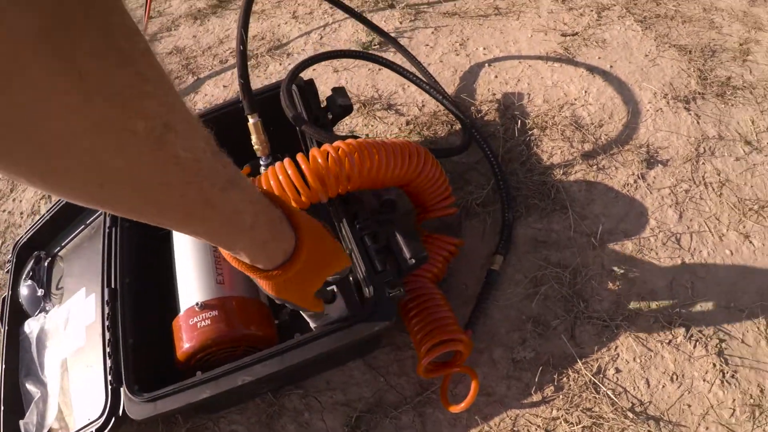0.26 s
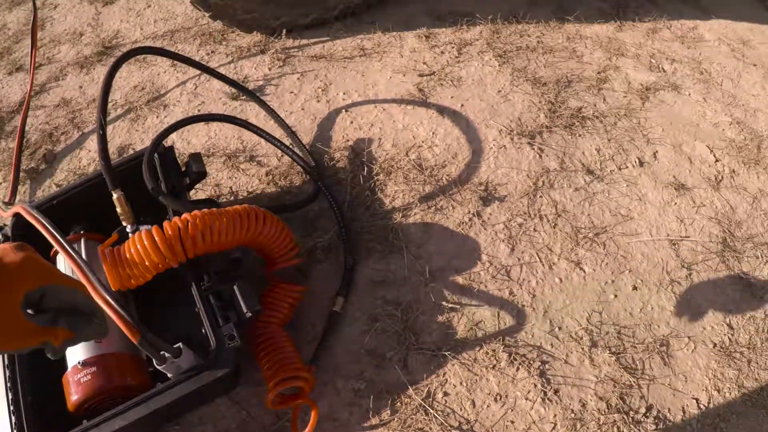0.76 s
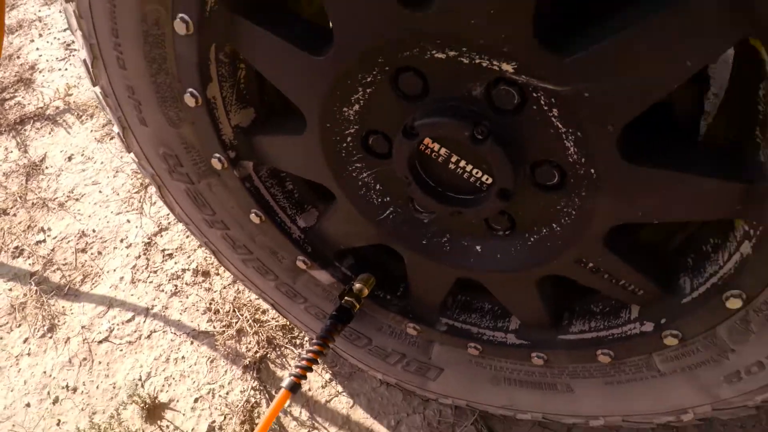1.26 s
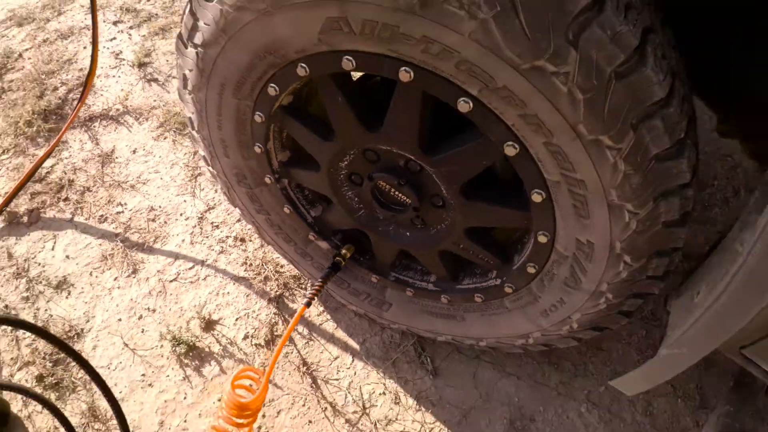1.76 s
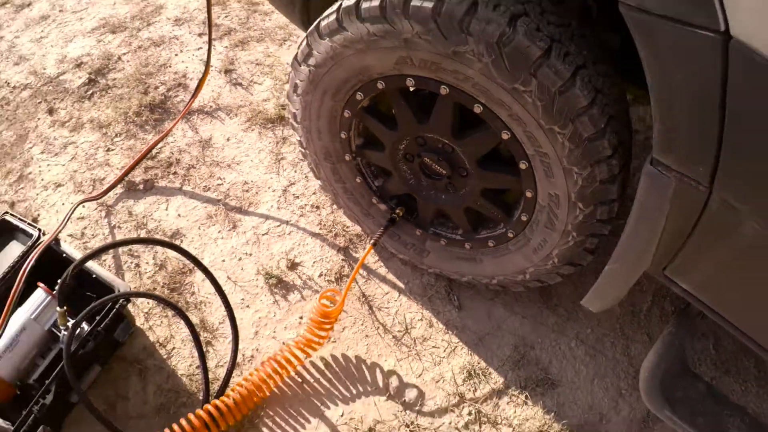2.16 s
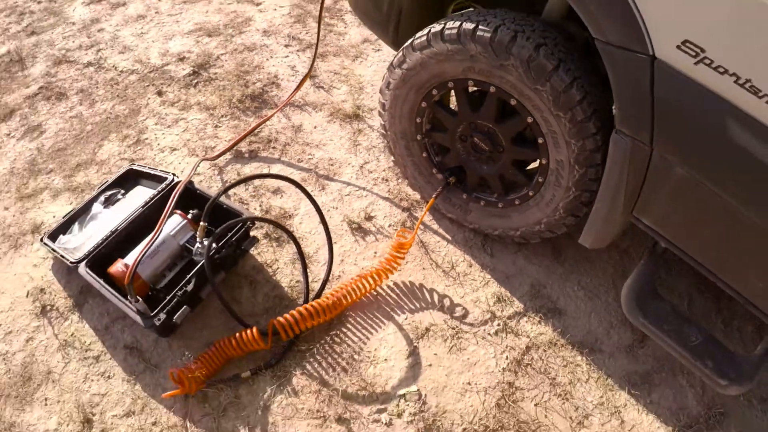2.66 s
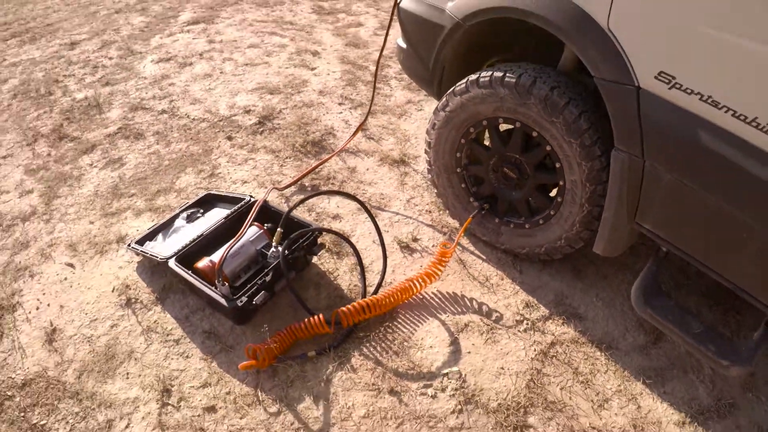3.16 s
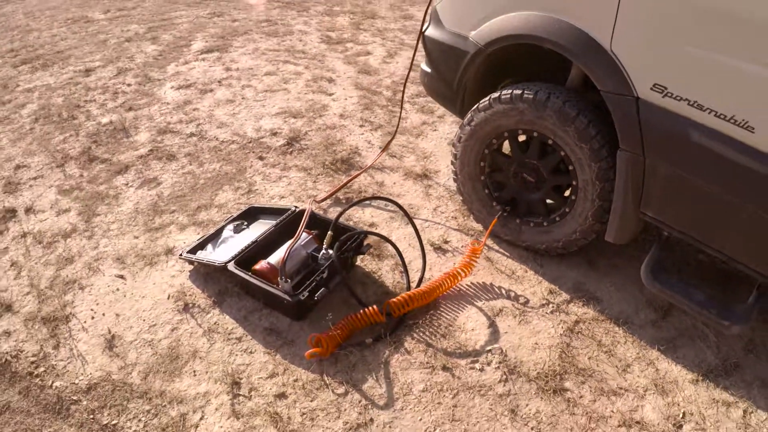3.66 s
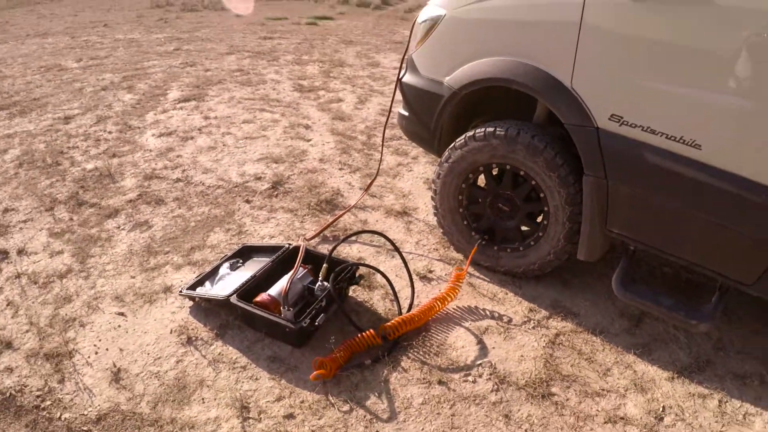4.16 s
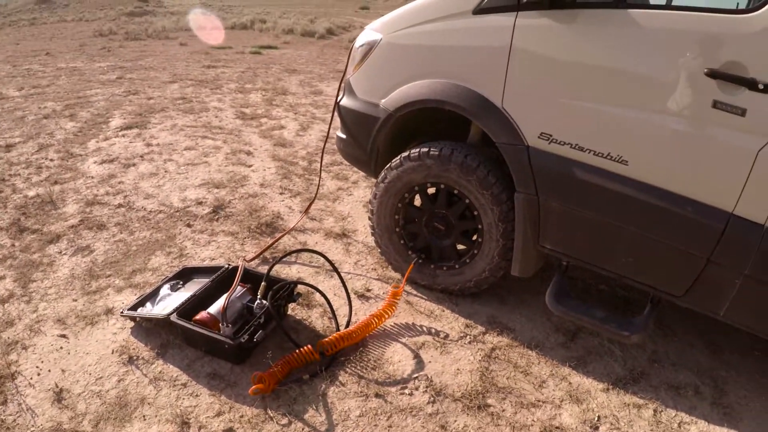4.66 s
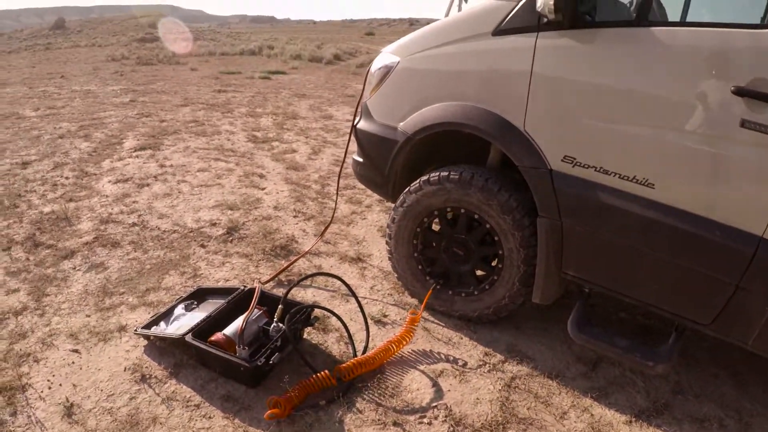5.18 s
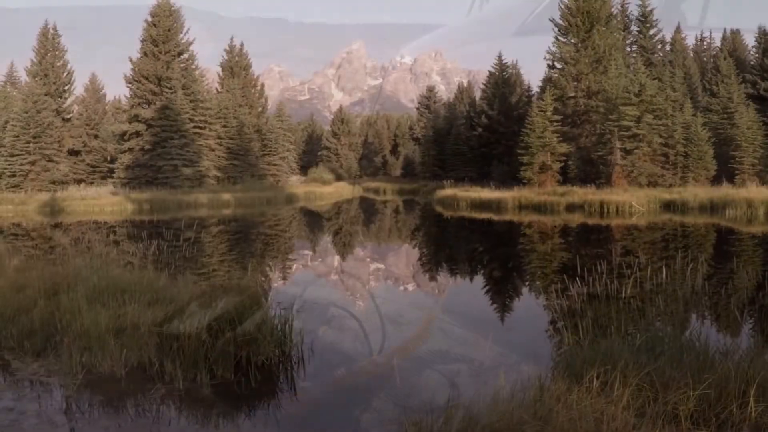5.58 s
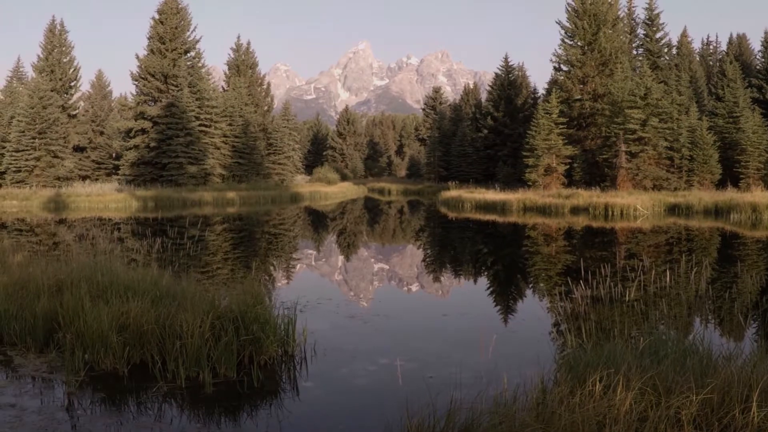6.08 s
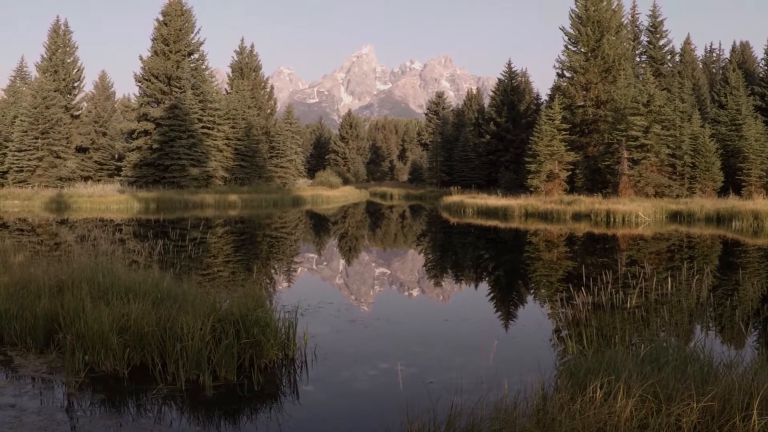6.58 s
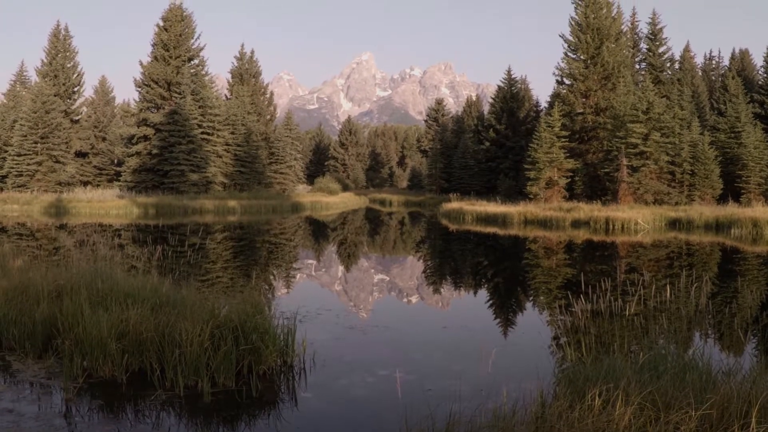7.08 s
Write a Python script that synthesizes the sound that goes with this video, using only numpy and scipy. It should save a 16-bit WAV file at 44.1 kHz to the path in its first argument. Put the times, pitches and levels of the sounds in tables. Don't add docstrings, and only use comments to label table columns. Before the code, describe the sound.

A small piston air compressor hammers loudly beside a van, fading under wind buffets, then gives way to birdsong and trickling water at a quiet pond.

```python
import sys
import numpy as np
from scipy import signal
from scipy.fft import rfft, irfft
from scipy.io import wavfile

SR = 44100
rng = np.random.default_rng(int(sys.argv[2]) if len(sys.argv) > 2 else 0)


def dump_mix(stems):
    frames = np.atleast_2d(stems).T
    limited = np.clip(frames, -1, 1)
    pcm = np.round(limited * 32767).astype(np.int16)
    wavfile.write(sys.argv[1], SR, pcm)


def voltage_ratio(decibels):
    exponent = np.asarray(decibels, float) / 20
    return 10 ** exponent


N = 323253

# order [multiple of revolution], level [dB]
STROKE_ORDERS = [(1, -11.5), (2, -11), (3, -6), (4, -8), (5, -11), (6, -7), (7, -10), (8, -19), (9, -16),
                 (10, -13), (11, -2), (12, -9), (13, 0), (14, -1), (15, -4), (16, -15), (17, -13),
                 (18, -17), (19, -23), (20, -22), (21, -25), (22, -25), (23, -23), (24, -22), (25, -27),
                 (26, -21), (27, -21), (28, -21), (29, -24), (30, -24), (31, -25), (32, -28)]
# t [s], rate [rev/s]
CRANK_SPEED = [(0.0, 68.21), (0.6, 68.28), (1.2, 68.36), (1.8, 68.41), (2.4, 68.43), (3.0, 68.57),
               (3.6, 68.49), (4.2, 68.54), (4.8, 68.63)]
# order [multiple of revolution], near level [dB], far level [dB]
GEAR_TONES = [(46, -29, -25), (48, -29, -18), (55, -28, -28), (58, -25, -17), (59, -30, -33),
              (61, -20, -20), (87, -18, -27), (88, -19, -27), (90, -21, -18), (116, -16, -16),
              (117, -15, -32), (118, -30, -14), (120, -22, -12), (122, -29, -21), (146, -22, -39),
              (148, -29, -29)]
# f [Hz], width [Hz], near level [dB], far level [dB]
METAL_RINGS = [(3260, 120, 1, -1), (3900, 550, -36, -16), (5340, 510, -8, -23), (6120, 680, 8, -2),
               (6740, 36, -18, -34), (6600, 330, -29, -2.5), (7960, 480, 7, -3), (8210, 320, 15, -1.5),
               (8840, 840, 4, 6), (9870, 280, 12, 9.5), (9870, 780, -12, -30), (11970, 720, 4.5, 3),
               (13100, 430, -8, 3), (13900, 490, -18, -16)]
# f [Hz], level [dB per Hz]
AIR_SPECTRUM = [(50, -26), (100, -7), (230, -5.5), (310, 6), (450, -1), (620, -6), (950, -2.5), (1500, -12),
                (2000, -13), (3500, -19.5), (4800, -21), (8200, -21), (14500, -21.5), (15500, -46)]
# t [s], push level [dB], flutter level [dB]
WIND_GUSTS = [(0.0, -54, -28), (0.27, -67, -39), (0.72, -33, -59), (1.36, -23, -28), (1.45, -27, -51),
              (1.62, -24, -42), (1.93, -24, -52), (2.03, -56, -46), (2.13, -24, -52), (2.3, -18.5, -33),
              (2.63, -20.5, -28), (2.8, -34, -34), (3.04, -27, -35), (3.42, -19.5, -50), (3.7, -24, -52),
              (4.23, -50, -58)]
# f [Hz], level [dB per Hz]
PUSH_SPECTRUM = [(2, -2), (8, 17), (20, 0.5), (30, -14.5), (60, -18), (300, -110)]
# f [Hz], level [dB per Hz]
FLUTTER_SPECTRUM = [(15, -17), (30, 13), (60, -5), (120, -24), (300, -57), (1500, -100)]
# f [Hz], level [dB per Hz]
HISS_SPECTRUM = [(21, -46), (35, -10), (60, -9), (123, -14), (368, -17.5), (598, -16), (947, -20.5),
                 (1350, -22), (2380, -24.5), (3770, -25), (7140, -37.5), (14600, -46.5), (15800, -49)]
# f [Hz], correlation [-1..1]
HISS_LIKENESS = [(60, 0.46), (130, 0.29), (300, 0.14), (700, .45), (1400, 0.68), (3000, 0.033),
                 (7000, 0.15), (15000, 0.57)]
# t [s], length [s], middle f [Hz], glide [octaves], peak level [dB]
LEFT_SLUR_NOTES = [(4.517, .058, 3700, -.35, -61), (4.59, .04, 4000, .6, -65),
                   (4.682, 0.054, 3800, .3, -66), (4.81, .029, 4000, .2, -62),
                   (5.12, 0.063, 2090, -.05, -58), (5.39, .045, 2400, .12, -63),
                   (5.455, .018, 4250, .13, -54), (5.69, 0.09, 2360, 0.27, -60),
                   (5.828, .094, 2150, -.25, -56), (5.948, 0.03, 4040, 0.14, -53),
                   (5.982, 0.079, 3870, -.38, -60), (6.534, .14, 2160, -0.18, -65),
                   (7.036, 0.036, 5150, -0.39, -54), (7.094, 0.024, 4500, 0.033, -47),
                   (7.07, .013, 3700, -.15, -57), (7.108, .013, 4100, .25, -51),
                   (7.185, 0.058, 4430, 0.086, -47), (7.228, .035, 4900, 0.26, -49)]
# t [s], middle f [Hz], peak level [dB]
LEFT_CHIPS = [(4.63, 3700, -68), (4.74, 3700, -65), (4.845, 3660, -61), (4.955, 3800, -63),
              (5.06, 3430, -54), (5.515, 3580, -53), (5.548, 3450, -60), (5.855, 3450, -54),
              (5.883, 3670, -58), (6.025, 3530, -49), (6.05, 3680, -52), (6.455, 3300, -54),
              (6.68, 3150, -58), (6.7, 3900, -59), (6.003, 3980, -60)]
# t [s], length [s], top f [Hz], peak level [dB]
LEFT_ARCHES = [
    (5.474, 0.036, 3670, -48.5),
    (5.733, 0.037, 2820, -56),
    (5.773, 0.045, 3480, -50),
    (5.816, 0.037, 3570, -50),
]
# t [s], peak level [dB]
TRILL_STARTS = [
    (6.14, -52),
    (6.236, -52),
    (6.318, -52),
    (6.412, -52),
    (6.507, -51),
    (6.598, -49),
]
# offset [s], length [s], first f [Hz], middle f [Hz], last f [Hz], level [dB]
TRILL_SYLLABLE = [
    (0., .02, 3150, 3050, 2850, -4),
    (.027, .03, 3000, 3600, 4000, -1),
]
# t [s], middle f [Hz], peak level [dB]
LEFT_DIVES = [
    (6.772, 5250, -54),
    (6.897, 5100, -63),
    (7.018, 5100, -64),
    (7.14, 5250, -60),
]
# t [s], length [s], middle f [Hz], peak level [dB]
LEFT_SWOOPS = [
    (7.256, .08, 5550, -47.5),
]
# t [s], first f [Hz], rise [octaves/s], t60 [s], peak level [dB]
LARGE_BUBBLES = [(4.82, 606, 4.5, 0.13, -50), (5.22, 2260, 11, 0.036, -41.5), (5.227, 89.5, -3, 0.066, -39),
                 (5.3, 594, 4, 0.16, -45.5), (5.42, 626, -4, .06, -49), (5.6, 465, 1, 0.23, -50.5),
                 (5.836, 461, 5, 0.24, -45), (6.095, 682, 15, 0.28, -48), (6.24, 730, 17, 0.048, -47),
                 (6.265, 845, 10.5, 0.15, -48), (6.275, 1960, 15, 0.036, -41),
                 (6.304, 1170, 1, 0.037, -42.5), (6.315, 597, -14, .06, -45.5),
                 (6.487, 643, -2.5, 0.19, -45.5), (6.243, 1500, 11, .05, -50), (6.8, 1850, 20, .03, -43),
                 (5.645, 1200, 15, .05, -50), (6.305, 2050, -10, .03, -48), (6.51, 620, -4, .1, -49),
                 (6.797, 1240, 10, 0.042, -45), (6.902, 1410, 34, 0.055, -45.5), (7.25, 597, 1, 0.11, -46),
                 (6.93, 654, 8.5, 0.16, -52), (7.04, 554, 0, .05, -46), (7.09, 786, 2, .05, -48),
                 (6.74, 700, 8, .05, -49), (7.3, 704, -6, .06, -53)]
# t [s], peak level [dB]
FALLING_STARTS = [
    (4.655, -59),
    (4.757, -53),
    (4.862, -53),
    (4.965, -48.5),
    (5.078, -48.5),
]
# offset [s], length [s], first f [Hz], middle f [Hz], last f [Hz], level [dB]
CHIRP_VOICES = [
    (0., 0.032, 7450, 7150, 6400, -10),
    (0.024, 0.044, 6750, 5600, 5250, -4),
    (0.036, .04, 6500, 5800, 5450, -15),
]
# t [s], length [s], middle f [Hz], glide [octaves], peak level [dB]
CENTRE_SLUR_NOTES = [
    (5.195, 0.042, 4700, 0.269, -54),
    (5.261, 0.026, 4350, -0.22, -53),
    (6.44, 0.21, 5850, .12, -69),
    (6.235, .048, 5250, .2, -64),
    (4.87, 0.056, 4200, 0.12, -62),
    (5.756, 0.021, 3950, 0.099, -53),
    (5.84, 0.039, 2900, .3, -55),
]
# t [s], length [s], top f [Hz], peak level [dB]
CENTRE_ARCH = (5.229, .038, 5500, -58)
# t [s], length [s], f [Hz], peak level [dB]
CENTRE_WHISTLES = [(5.36, .022, 2960, -58), (5.65, 0.032, 2950, -58), (5.875, 0.056, 2950, -49),
                   (6.05, 0.056, 3110, -51), (6.703, 0.027, 4250, -58), (6.727, .125, 5930, -64),
                   (6.775, .045, 4270, -61), (6.865, .075, 5900, -70), (6.86, .04, 4270, -63),
                   (6.828, 0.031, 2620, -60), (6.21, 0.038, 3100, -63), (6.578, .03, 3100, -62),
                   (6.88, .058, 3110, -61), (6.979, 0.168, 5920, -64), (7.13, 0.2, 4050, -63),
                   (7.185, 0.064, 3100, -61), (7.23, 0.092, 5870, -63)]
# t [s], held [s], f [Hz], peak level [dB], scoop level [dB]
RIGHT_WHISTLES = [
    (4.719, 0.19, 1684, -60.5, -74),
    (5.435, 0.22, 1590, -59.5, -50.5),
    (6.35, 0.245, 1646, -54, -52),
    (7.285, .2, 1646, -52, -55),
]
# t [s], peak level [dB]
DROPLETS = [
    (5.377, -53),
    (6.2, -65),
    (6.41, -66),
    (6.885, -60),
    (7.115, -64),
]

PUMP_DB, BRIGHT_DB, AIR_DB = -33.5, -7, -2.5
SETTLE_DB, SETTLE_S = -2, 0.089
FADE_FROM_S, FADE_TO_S, FADE_POWER = 0.46, 5.11, 1.074
FLARE_S, CUT_S, FLARE_DB, FLARE_RISE_DB = 5.115, 5.196, -57.5, -2
FLARE_BRIGHT_DB, FLARE_AIR_DB = -12, 0.5
THUD_LAG_TURNS, PANEL_LAG_TURNS, SCATTER = -0.1717, 0.42, 0.5
BARS, BRUSH_SLACK, SURGE = 30, 0.322, 0.0052
BRUSHES = [(0.06, -3.5), (1, -16)]
AIR_DULL_HZ, AIR_DULL_SHARE = 8000, 0.45
CALM_PUSH_DB, CALM_FLUTTER_DB, PUSH_S, FLUTTER_S = -32.5, -82, 0.062, 0.024
BUMP_S, BUMP_DB = 5.2, -53
POND_S, POND_DB, POND_START_DB, POND_FULL_S = 4.49, -51.5, -6, 5.3
RUMBLE_S, RUMBLE_DB, RUMBLE_EARLY_DB = 5.25, -41.5, -61
RUMBLE_GUST_S, RUMBLE_GUST_WIDTH_S, RUMBLE_GUST_DB = 5.99, 0.35, 5.5
CHIP_S, CHIP_GLIDE, CHIP_ARCH = 0.0276, -0.33, 0.02
DIVE_S, DIVE_GLIDE = 0.016, -0.36
SWOOP_GLIDE, SWOOP_ARCH = -0.53, 0.33
ARCH_GLIDE, ARCH, SLUR_ARCH, WHISTLE_ARCH = -0.13, 0.276, 0.017, 0.013
SCOOP_S, SCOOP_GLIDE, HELD_ARCH = 0.0363, 0.454, 0.0314
HOOK_S, HOOK_DROP, HOOK_ARCH = 0.018, 0.185, -0.11


def in_time(points, left=None):
    s, value = np.transpose(points)
    return np.interp(np.arange(N) / SR, s, value, left=left)


def at_hz(points, hz):
    point_hz, value = np.transpose(points)
    return np.interp(np.log(hz), np.log(point_hz), value)


def rms_one(x):
    return x / np.sqrt(np.mean(x ** 2) + 1e-20)


def drift(rate_hz):
    r = np.exp(-80 * np.pi * rate_hz / SR)
    slow = signal.lfilter([1], [1, -2 * r, r * r], rng.standard_normal(N // 40 + 4002))[4000:]
    return np.interp(np.arange(N) / 40, np.arange(len(slow)), rms_one(slow - slow.mean()))


def coloured(spectrum, channels=1):
    hz = np.maximum(np.fft.rfftfreq(N, 1 / SR), 1)
    white = rng.standard_normal((channels, N))
    return rms_one(irfft(rfft(white) * voltage_ratio(at_hz(spectrum, hz)), N))


def lump(s, width_s):
    t = np.arange(0, N, 16) / SR
    return np.repeat(np.exp(-0.5 * ((t - s) / width_s) ** 2), 16)[:N]


def fade():
    t = np.arange(N) / SR
    return np.clip((FADE_TO_S - t) / (FADE_TO_S - FADE_FROM_S), 1e-6, 1) ** FADE_POWER


def revolve(orders, turns):
    size = 8192
    cycle = rms_one(irfft(np.r_[0, orders], size))
    return np.interp(turns % 1 * size, np.arange(size + 1), np.r_[cycle, cycle[0]])


def body(turns):
    level = np.log(voltage_ratio(np.r_[-30, np.array(STROKE_ORDERS)[:, 1], np.full(32, -34)]))
    cepstrum = irfft(level)
    cepstrum[1:64] *= 2
    cepstrum[65:] = 0
    order = np.arange(65)
    lag_turns = np.where(order <= 10, THUD_LAG_TURNS, np.where(order <= 12, PANEL_LAG_TURNS, 0))
    spread = SCATTER * np.maximum(order - 16, 0) ** 2 + 0.139 * np.maximum(9 - order, 0) ** 2
    spread = spread - 2 * np.pi * np.cumsum(lag_turns)
    after_valve = -2 * np.pi * 0.1618 * order
    phase = 0.35 * rfft(cepstrum).imag + spread + after_valve
    return revolve(np.exp(level + 1j * phase)[1:33], turns)


def gears(turns, farness):
    flicker_db = [0.45 * drift(9) for k in range(8)]
    out = 0
    for k, (order, near_db, far_db) in enumerate(GEAR_TONES):
        level_db = near_db + (far_db - near_db) * farness + flicker_db[k % 8]
        out = out + voltage_ratio(level_db) * np.cos(2 * np.pi * order * turns)
    return out


def brush_ticks(order, slack_bars):
    draws = rng.standard_normal((BARS, 2))
    even = (np.arange(BARS) + 0.5 + slack_bars * draws[:, 0]) / BARS
    slot = even + SURGE * np.sin(2 * np.pi * even)
    intake_dip_db = 12 * np.sin(1.65 * abs(even) ** 1.3)
    size = voltage_ratio(4.5 * draws[:, 1] - intake_dip_db)
    return np.exp(-2j * np.pi * order[:, None] * slot) @ size


def metal(turns, farness):
    order = np.arange(33, 226)
    ring_hz, width_hz, near_db, far_db = np.transpose(METAL_RINGS)
    shape = 1 / (1 + 2j * (order[:, None] * 68.4 - ring_hz) / width_hz)
    free = ~np.isin(order, np.array(GEAR_TONES)[:, 0])
    direct_click = voltage_ratio(-6) * np.interp(order, [0, 90, 150, 225], [0, 1, 0.85, 0.4])
    below = np.zeros(32)
    out = 0
    for share, ring_db in ((1 - farness, near_db), (farness, far_db)):
        rings = shape @ voltage_ratio(ring_db)
        click = revolve(np.r_[below, 0.5 * rings + direct_click], turns)
        out = out + share * voltage_ratio(-4 + 0.8 * drift(20)) * click
        for slack_share, direct_db in BRUSHES:
            ticks = brush_ticks(order, BRUSH_SLACK * slack_share)
            ringing = revolve(np.r_[below, free * ticks * (rings + voltage_ratio(direct_db))], turns)
            out = out + share * voltage_ratio(-2 + 1.5 * drift(0.31)) * ringing
    return out / np.sqrt(farness ** 2 + (1 - farness) ** 2)


def puffing_air(turns, farness):
    puff = voltage_ratio(0.14 * np.cos(2 * np.pi * (turns - 0.1)))
    air = (running() * voltage_ratio(AIR_DB) + flare() * voltage_ratio(FLARE_AIR_DB)) * puff * coloured(AIR_SPECTRUM)[0]
    treble = signal.sosfiltfilt(signal.butter(1, AIR_DULL_HZ, "high", fs=SR, output="sos"), air)
    return air - AIR_DULL_SHARE * farness * treble


def running():
    t = np.arange(N) / SR
    return voltage_ratio(PUMP_DB + SETTLE_DB * np.exp(-t / SETTLE_S)) * fade()


def flare():
    t = np.arange(N) / SR
    level = voltage_ratio(FLARE_DB + FLARE_RISE_DB * (t - CUT_S) / (CUT_S - FLARE_S))
    return level * np.clip((t - FLARE_S) / 0.02, 0, 1) * np.clip((CUT_S - t) / 0.0033, 0, 1)


def compressor():
    turns = np.cumsum(in_time(CRANK_SPEED)) / SR + 0.175 + 0.0008 * drift(5)
    farness = in_time([(1.1, 0.011), (3.2, 0.75)])
    tone = voltage_ratio(3.5 + 0.045 * drift(12)) * body(turns) + gears(turns, farness)
    ticks = metal(turns + 0.00035 * drift(60), farness)
    bright = running() * voltage_ratio(BRIGHT_DB - 4.5) + flare() * voltage_ratio(FLARE_BRIGHT_DB - 4)
    whole = (running() + flare()) * tone + bright * ticks + puffing_air(turns, farness)
    return signal.sosfilt(signal.ellip(10, 1, 55, 15280, fs=SR, output="sos"), whole)


def wind():
    push = voltage_ratio(CALM_PUSH_DB) + sum(voltage_ratio(db) * lump(s, PUSH_S) for s, db, _ in WIND_GUSTS)
    flutter = voltage_ratio(CALM_FLUTTER_DB) + sum(voltage_ratio(db) * lump(s, FLUTTER_S) for s, _, db in WIND_GUSTS)
    flutter = flutter * fade() + voltage_ratio(BUMP_DB) * lump(BUMP_S, 0.016)
    push_noise = voltage_ratio(5.65 * drift(5.9)) * coloured(PUSH_SPECTRUM)[0]
    flutter_noise = voltage_ratio(2 * drift(6.5)) * coloured(FLUTTER_SPECTRUM)[0]
    return push * fade() * push_noise + flutter * flutter_noise


def far_hiss():
    level_db = in_time([(POND_S, POND_DB + POND_START_DB), (POND_FULL_S, POND_DB)], left=-120)
    hz = np.maximum(np.fft.rfftfreq(N, 1 / SR), 1)
    alike = np.clip(at_hz(HISS_LIKENESS, hz), -1, 1)
    mid, side = rfft(coloured(HISS_SPECTRUM, channels=2))
    mid = irfft(mid * np.sqrt(1 + alike), N)
    side = irfft(side * np.sqrt(1 - alike), N)
    return voltage_ratio(level_db + 0.84 + 1.4 * drift(20)) * np.array([mid + side, mid - side]) / np.sqrt(2)


def pond_rumble():
    early, late = (RUMBLE_S - 0.08, RUMBLE_EARLY_DB), (RUMBLE_S, RUMBLE_DB)
    level_db = in_time([(POND_S, RUMBLE_EARLY_DB), early, late], left=-120)
    level_db = level_db + RUMBLE_GUST_DB * lump(RUMBLE_GUST_S, RUMBLE_GUST_WIDTH_S)
    spectrum = [(1.5, -13), (8, 32), (12, 22), (22, 17), (32, -10), (60, -50), (200, -90)]
    return voltage_ratio(level_db) * coloured(spectrum)[0]


def sing(notes, rough_db):
    out = np.zeros(N + SR)
    quaver = np.r_[1 + 0.006 * drift(70), np.ones(SR)]
    for s, length_s, first_hz, mid_hz, last_hz, db in notes:
        u = np.linspace(0, 1, int(length_s * SR))
        span = slice(int(s * SR), int(s * SR) + len(u))
        hz = first_hz * (1 - u) * (1 - 2 * u) + 4 * mid_hz * u * (1 - u) + last_hz * u * (2 * u - 1)
        phase = 2 * np.pi * np.cumsum(hz * quaver[span]) / SR
        out[span] += voltage_ratio(db) * np.sin(np.pi * u) ** 0.5 * np.sin(phase)
    return out[:N] * voltage_ratio(rough_db * drift(30))


def slur(s, length_s, hz, glide, db, arch):
    return s, length_s, hz * 2 ** (-glide / 2 - arch), hz, hz * 2 ** (glide / 2 - arch), db


def repeat(starts, template):
    return [(s + offset_s, length_s, first_hz, mid_hz, last_hz, db + part_db)
            for s, db in starts
            for offset_s, length_s, first_hz, mid_hz, last_hz, part_db in template]


def placed(x, pan_db, lag_ms, echo_db):
    out = np.array([np.roll(x, max(round(sign * lag_ms * SR / 1000), 0)) for sign in (-1, 1)])
    echo_lags = (rng.uniform(0.0099, 0.08, 14) * SR).astype(int)
    for k, lag in enumerate(echo_lags):
        out[k % 2, lag:] += voltage_ratio(echo_db + 4.5 - 160 * lag / SR) * x[:-lag]
    return out * voltage_ratio([[pan_db / 2], [-pan_db / 2]])


def left_birds():
    notes = [slur(s, CHIP_S, hz, CHIP_GLIDE, db, CHIP_ARCH) for s, hz, db in LEFT_CHIPS]
    notes += [slur(*row, SLUR_ARCH) for row in LEFT_SLUR_NOTES]
    notes += [slur(s, n, hz, ARCH_GLIDE, db, ARCH) for s, n, hz, db in LEFT_ARCHES]
    notes += [slur(s, DIVE_S, hz, DIVE_GLIDE, db, 0) for s, hz, db in LEFT_DIVES]
    notes += [slur(s, n, hz, SWOOP_GLIDE, db, SWOOP_ARCH) for s, n, hz, db in LEFT_SWOOPS]
    return sing(notes + repeat(TRILL_STARTS, TRILL_SYLLABLE), rough_db=2.2)


def bubbles(per_s, small_db):
    rows = list(LARGE_BUBBLES)
    for k, (a, b, c, d) in enumerate(rng.random((130, 4))):
        s = 4.6 + (k + a) / per_s
        if s < N / SR:
            rows.append((s, 350 * 2 ** (2.6 * b), 12 * c, 0.05, small_db - 9 * d))
    out = np.zeros(N + SR)
    t = np.arange(int(0.2 * SR)) / SR
    for s, hz, rise, t60_s, db in rows:
        swell = np.minimum(t / 0.00083, 1) * voltage_ratio(db - 60 * t / t60_s)
        phase = 2 * np.pi * np.cumsum(hz * 2 ** np.minimum(rise * t, 1)) / SR
        start = int(s * SR)
        out[start:start + len(t)] += swell * np.sin(phase)
    return out[:N]


def centre_birds():
    notes = [slur(s, n, hz, 0, db, WHISTLE_ARCH) for s, n, hz, db in CENTRE_WHISTLES]
    notes += [slur(*row, SLUR_ARCH) for row in CENTRE_SLUR_NOTES]
    s, length_s, top_hz, db = CENTRE_ARCH
    notes.append(slur(s, length_s, top_hz, 0, db, ARCH))
    return sing(notes + repeat(FALLING_STARTS, CHIRP_VOICES), rough_db=2.1)


def right_bird():
    notes = []
    for s, held_s, hz, db, scoop_db in RIGHT_WHISTLES:
        hook_at_s = s + 0.735 * SCOOP_S + held_s
        notes.append(slur(s, SCOOP_S, hz * 2 ** (-SCOOP_GLIDE / 2), SCOOP_GLIDE, scoop_db, 0))
        notes.append(slur(s + 0.766 * SCOOP_S, held_s, hz, 0, db, HELD_ARCH))
        notes.append(slur(hook_at_s, HOOK_S, hz * 2 ** -HOOK_DROP, 0, scoop_db, HOOK_ARCH))
    return sing(notes, rough_db=2.5)


def chatter(per_s, far_db):
    sides = []
    for side in range(2):
        flock = []
        for k, (a, b, c, d, e) in enumerate(rng.random((int(2.4 * per_s), 5))):
            first_hz, mid_hz, last_hz = 2200 + 2600 * c, 2600 + 2000 * c, 2200 + 2600 * d
            flock.append((4.9 + (k + a) / per_s, 0.015 + 0.03 * b, first_hz, mid_hz, last_hz, far_db - 8 * e))
        sides.append(sing(flock, rough_db=3.4))
    return np.array(sides)


def droplets():
    out = np.zeros(N)
    t = np.arange(int(0.012 * SR)) / SR
    for s, db in DROPLETS:
        start = int(s * SR)
        out[start:start + len(t)] = voltage_ratio(db + 14 - 60 * t / 0.012) * rng.standard_normal(len(t))
    return signal.sosfilt(signal.butter(2, [2800, 7000], "band", fs=SR, output="sos"), out + 1e-18)


def scene():
    yard = compressor() + wind()
    pond = far_hiss() + pond_rumble()
    birds = voltage_ratio(1.5) * placed(left_birds(), pan_db=6, lag_ms=0.115, echo_db=-19)
    water = placed(bubbles(per_s=45, small_db=-53), pan_db=-7, lag_ms=-0.1, echo_db=-16)
    birds = birds + placed(centre_birds(), pan_db=1, lag_ms=0, echo_db=-10)
    birds = birds + placed(right_bird(), pan_db=-6, lag_ms=-0.08, echo_db=-12)
    birds = birds + voltage_ratio(-7.5) * chatter(per_s=70, far_db=-54.5)
    return yard + pond + water + birds + droplets()


def top_cut(x):
    return signal.sosfilt(signal.butter(12, 15920, fs=SR, output="sos"), x)


def record(dry):
    mix = signal.sosfilt(signal.ellip(10, 0.5, 60, 15730, fs=SR, output="sos"), dry)
    return top_cut(mix)


dry = scene()
out = record(dry)
dump_mix(out)
```